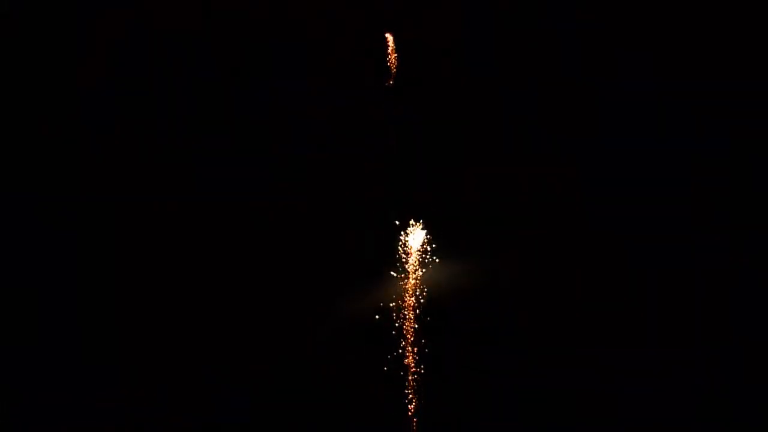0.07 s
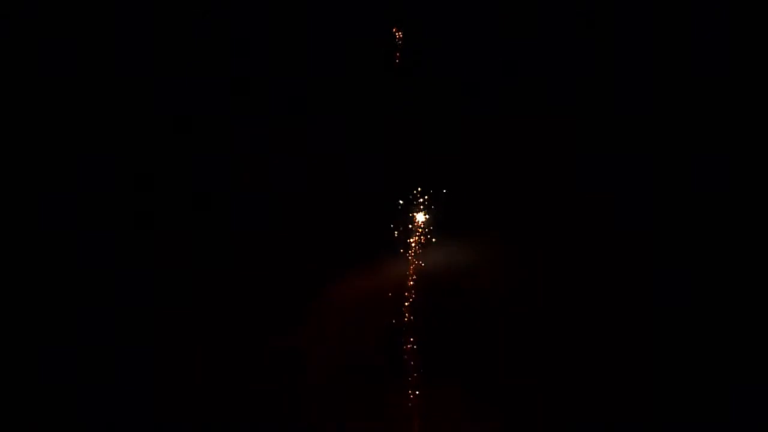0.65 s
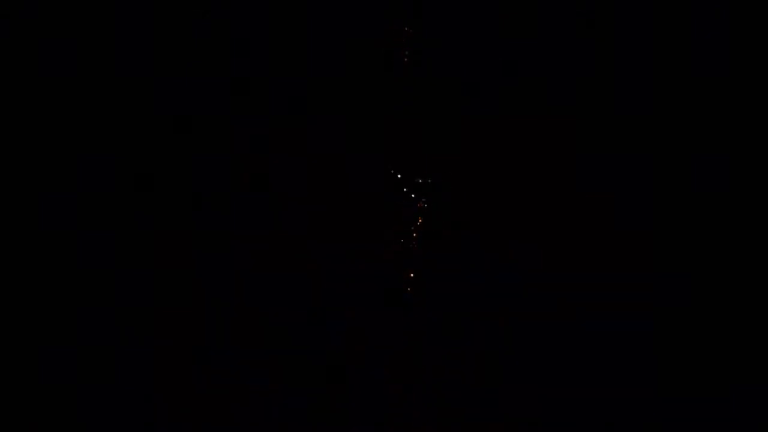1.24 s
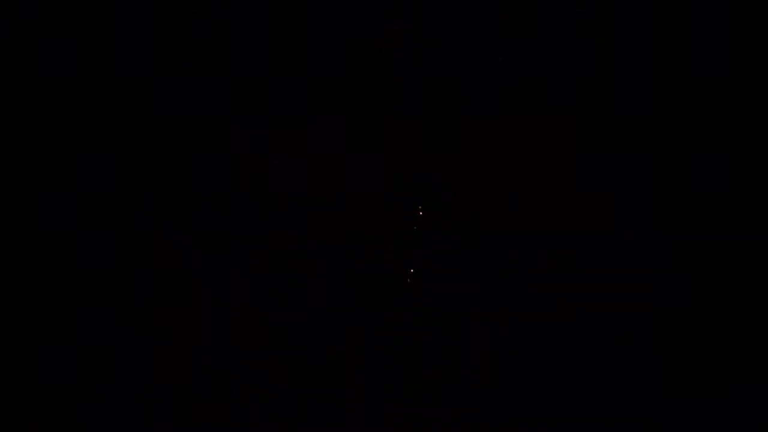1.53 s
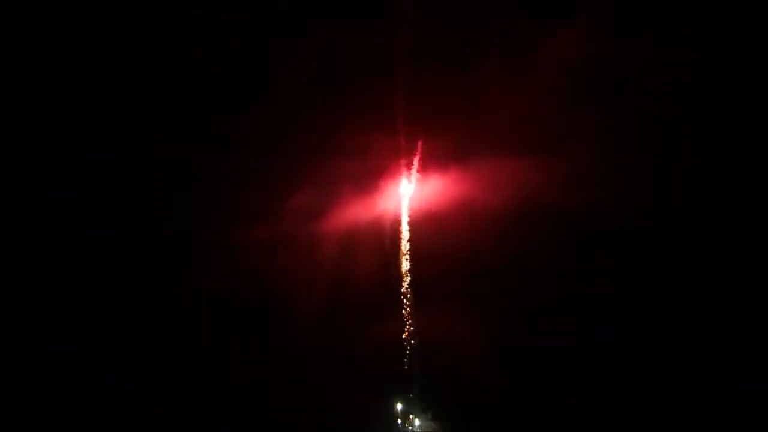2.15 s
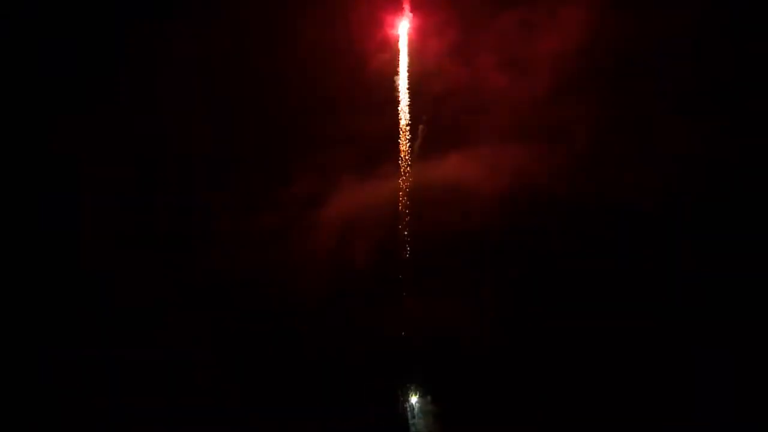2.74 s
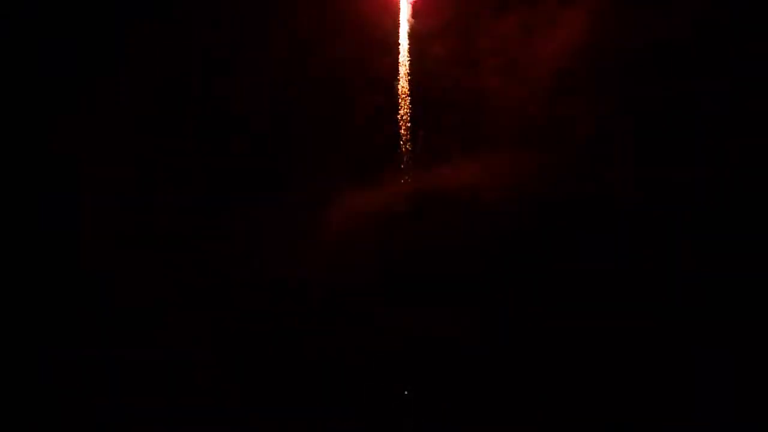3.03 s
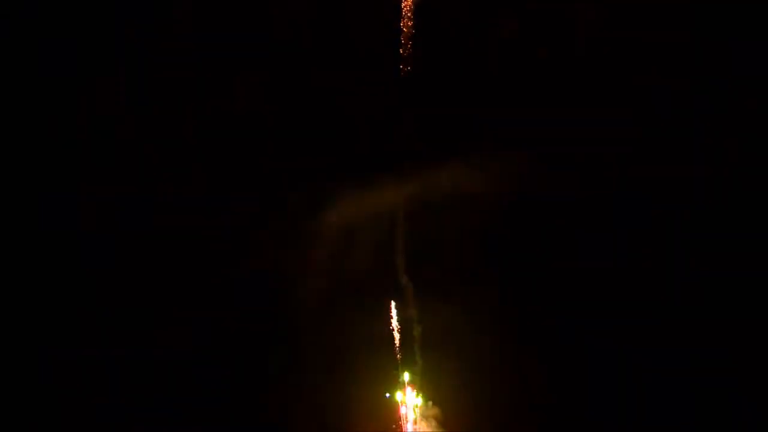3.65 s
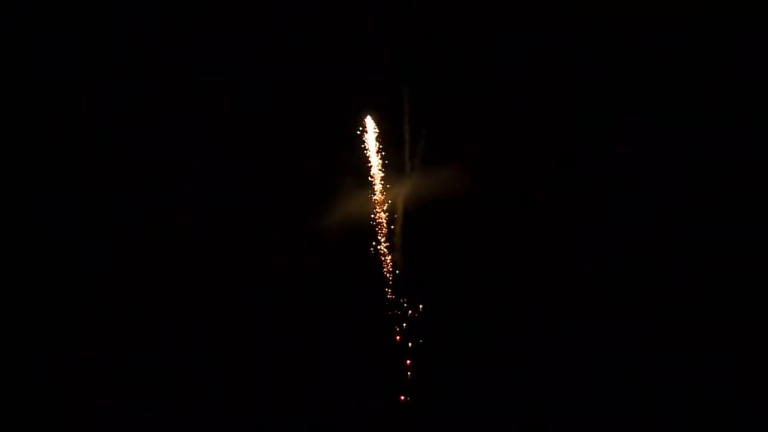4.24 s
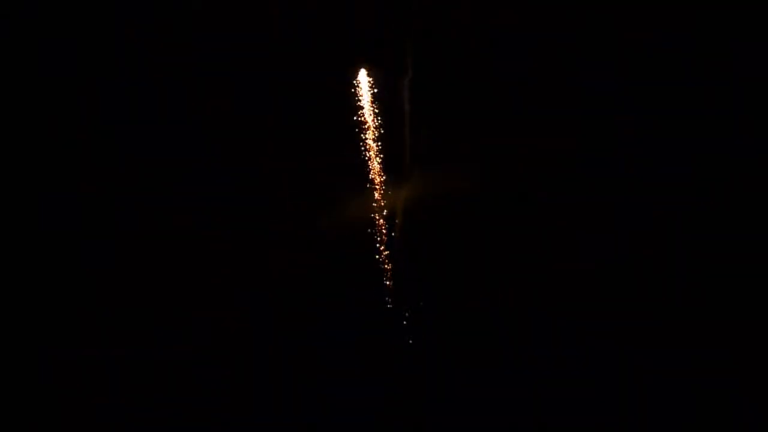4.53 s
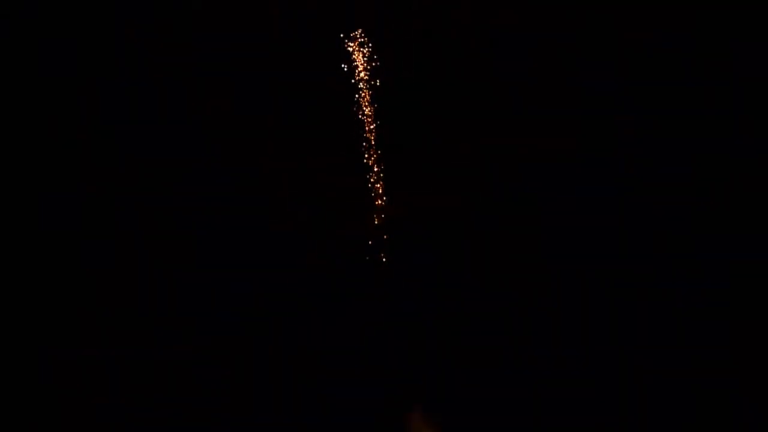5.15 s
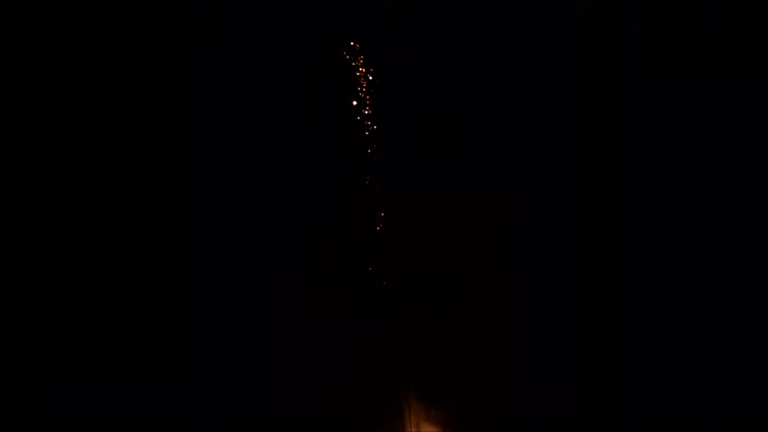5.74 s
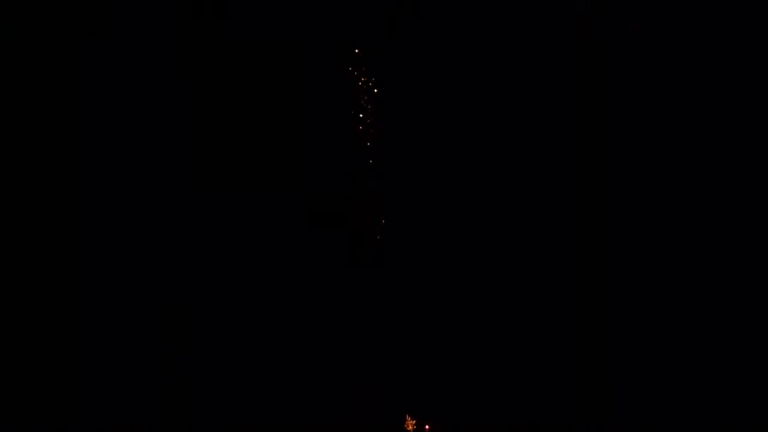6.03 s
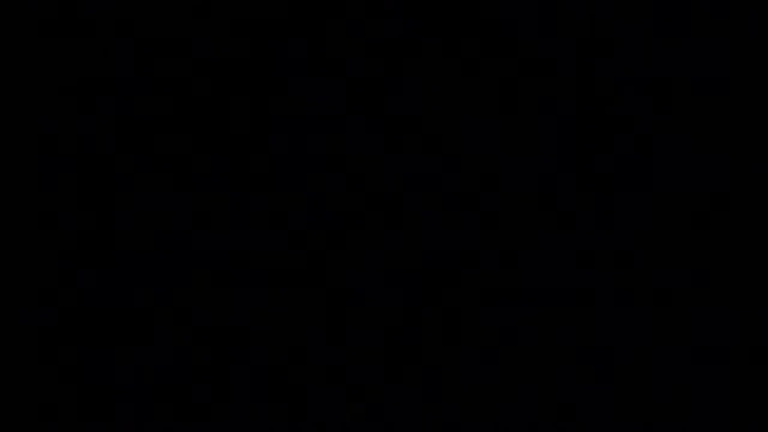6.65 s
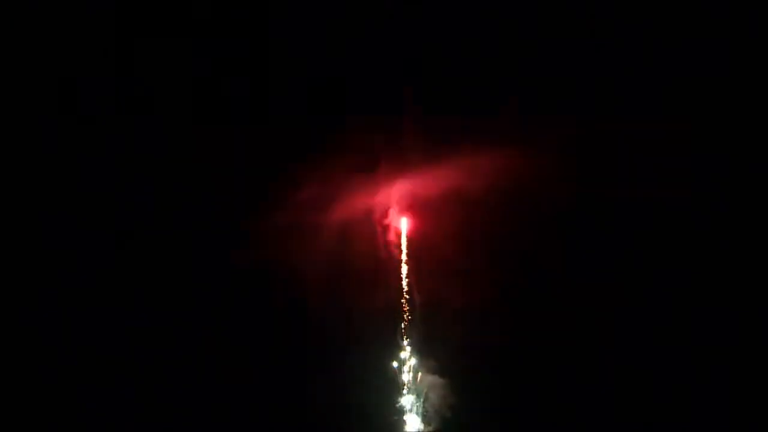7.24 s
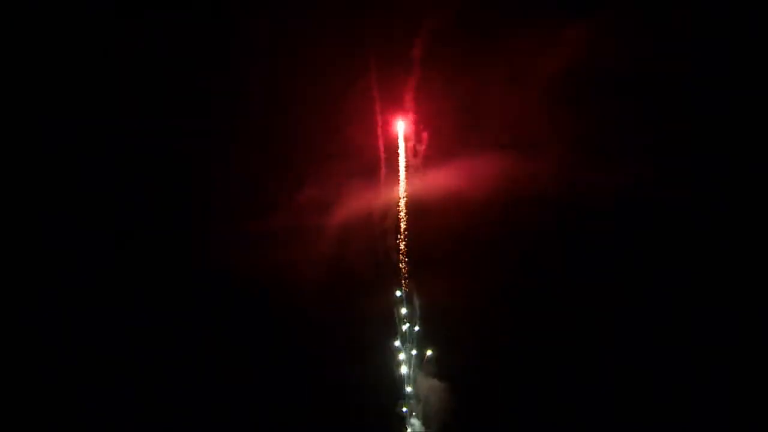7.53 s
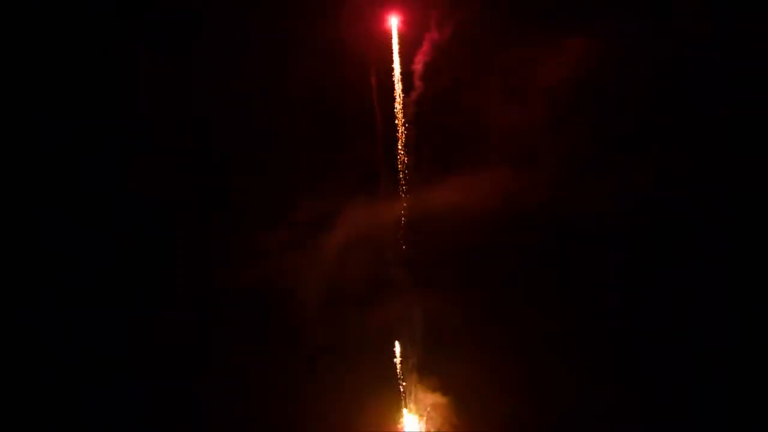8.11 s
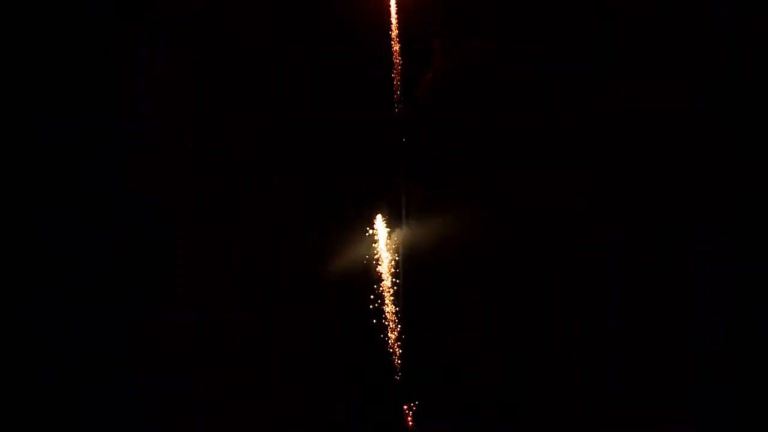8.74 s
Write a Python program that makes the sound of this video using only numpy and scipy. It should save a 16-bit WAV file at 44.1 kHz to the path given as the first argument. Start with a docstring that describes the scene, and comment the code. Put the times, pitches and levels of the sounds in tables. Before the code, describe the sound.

A firework battery fires outdoors, opening on the dense crackle of a climbing comet, with a soft launch thump near 0.4 seconds. From 0.8 to 1.5 seconds, stars burst in sharp cracks that bunch into a swarm. A fuse whistles faintly, and a blunt thump at 1.8 seconds releases a soft, fading hiss. After a faint fuse rush, another thump at 3.6 seconds starts a crackling tail that sweeps in tone and thins out around a weak thump at 5.3. A second swarm of cracks runs from 5.9 to 6.4 seconds, with one loud crack at 6.6. The strongest thump lands at 7 seconds, followed by soft hissing. Another at 8.1 brings crackle from 8.4 until about 9. Far walls echo lightly, while a breeze rumbles over a faint low hum, mostly on the left.

```python
"""A firework battery fires outdoors at night: its tubes thump and send up comets. Red comets hiss softly;
gold ones trail tiny exploding grains and, at the top, a swarm of stars bursts in sharp cracks.
The ground repeats each crack a few milliseconds later, and the gap grows as a comet climbs, so the
crackle sweeps in tone. Fuses whistle faintly and far walls answer.
A breeze rumbles over a faint low hum, mostly on the left."""
import sys
import numpy as np
from scipy import signal
from scipy.fft import rfft, irfft, next_fast_len
from scipy.io import wavfile
from scipy.ndimage import uniform_filter1d, minimum_filter1d, map_coordinates

SR = 44100
rng = np.random.default_rng(int(sys.argv[2]) if len(sys.argv) > 2 else 0)


def store_wav(level_fs):
    """Save 16-bit WAV to argv[1]."""
    pcm = np.round(np.clip(np.atleast_2d(level_fs), -1, 1) * 32767)
    wavfile.write(sys.argv[1], SR, pcm.T.astype(np.int16))


N = 396018

# Charges that launch the comets. Each row: start in seconds, level, treble and bass in dB, tube pitch in Hz.
LIFT_CHARGES = [(0.4469, -10, -9, -3, 345), (1.7646, 0.5, 0, -2, 350), (3.576, 0, 2.5, -2.5, 410),
                (5.3272, -10.5, -8, -6, 345), (7.0435, 8.5, 1, 0.5, 370), (8.0573, -1, -0.5, -7, 350)]
# Gold comets. Each row: launch in seconds, typical grain level in dB,
# ground-echo delay gained over the climb in milliseconds, burning time in seconds.
GOLD_COMETS = [(-1.15, -13.3, 2.6, 1.34), (3.576, -19, 3.35, 1.49), (8.0573, -16.2, 2.7, 1.45)]
# The largest grains in the gold tails. Each row: start in seconds, relative level in dB.
BIG_GRAINS = [(0.0139, -4.5), (0.022, -5.5), (0.0361, -6), (0.0728, -2.5), (0.1101, -1.5), (0.1152, -5),
              (0.158, -1), (0.2074, -4), (0.2167, -0.5), (0.241, -3), (0.2774, 2.5), (0.296, -3.5),
              (0.3653, -4), (0.3888, -4), (0.4177, 0.5), (0.4389, -2), (0.4528, 0), (0.4886, -1),
              (0.522, -6.5), (0.5715, -2.5), (0.5823, -1.5), (0.6394, -23), (0.6892, -22), (3.8219, -17.5),
              (3.8476, -14), (3.8908, -6), (3.901, -9), (3.9521, -11), (4.0092, -5), (4.0529, -10),
              (4.063, -8), (4.3836, -5), (4.5005, -7.5), (4.5809, -7), (4.6222, -10), (4.6419, -3),
              (4.6988, -4), (4.778, -10), (4.8098, -3), (4.839, -7), (5.0142, -11), (5.1456, -12),
              (5.1752, -14), (5.2117, -21.5), (5.2754, -5), (5.457, -27.5), (5.6037, -25), (5.7783, -27.5),
              (8.371, -11.5), (8.4122, -9), (8.5544, -4.5), (8.5669, -5), (8.6216, -6.5), (8.7274, -5),
              (8.7396, -2.5), (8.7553, -6), (8.8123, -5.5), (8.8944, -8), (8.955, -9)]
# Stars that stand out, alone or by their strength. Each row: start in seconds, relative level in dB.
SINGLE_STARS = [(0.7942, -2), (0.8888, -5), (0.9826, 2), (1.014, -1.5), (1.0413, -2), (1.0633, -4.5),
                (1.0699, 1), (1.0873, -6), (1.1182, -2), (1.1231, -5), (1.1397, -2), (1.1935, 4),
                (1.2161, 0), (1.2303, 2.5), (1.2593, 3), (1.3157, 5), (1.3443, 4.5), (1.3649, 0.5),
                (1.3884, 0.5), (1.393, -2), (1.398, -3), (1.4282, 1), (1.495, -2), (1.5359, -1), (5.886, 1),
                (5.9403, -1.5), (5.9504, -3), (5.9762, 1), (6.0677, 0), (6.0925, 5), (6.1006, 4.5),
                (6.1052, 2), (6.113, 2), (6.1441, 1.5), (6.1619, 2.5), (6.1851, 1.5), (6.2151, -4),
                (6.2246, -4.5), (6.2528, 2), (6.3084, 0), (6.3397, -3.5), (6.4214, -2.5), (6.6367, 8.8)]
# Thick swarms of stars. Each row: start and length in seconds, relative level in dB,
# ground-echo delay in milliseconds.
STAR_SWARMS = [(1.158, .185, -3, 3.2), (5.963, .18, -3.5, 2.76)]
# Red comets. Each row: launch in seconds, rush level in dB, sizzle level in dB.
RED_COMETS = [(1.7646, -47.5, -65), (7.0435, -49, -64)]
# Gas jets of the fuses. Each row: start and length in seconds, pitch in Hz, level in dB, pitch waver in Hz.
FUSE_JETS = [(1.5, .52, 1650, -58, 26), (3.14, .5, 1880, -56, 450)]
# Level of the low rumble, which ducks during the loud star bursts.
# Each row: time in seconds, relative level in dB.
RUMBLE_LEVELS = [(0.0, -53), (0.57, -52), (1.45, -60), (2.58, -51), (4.35, -55), (4.63, -50), (5.95, -56),
                 (6.4, -60), (7.65, -54), (7.98, -55), (8.68, -52), (8.98, -55)]
# The tone of five sounds. Each row: frequency in Hz, relative level in dB.
CRACK_TONE = [(40, -7), (200, -14), (450, -4.5), (1000, -3.5), (2200, -1.5), (3300, -1.5), (4300, -13),
              (6000, -16), (9000, -20), (12000, -24.5), (14000, -37), (16000, -37)]  # a grain or star bursting
THUMP_TONE = [(25, 3), (70, 7.5), (200, 1.5), (380, -1), (700, -4.5), (1500, -13), (2400, -10.5),
              (3400, -16.5), (4500, -29), (9000, -35.5), (15000, -52)]  # a lift charge
RUSH_TONE = [(60, 9), (300, 2), (700, 4.5), (1500, 3), (2700, -2), (3700, -3.5), (4600, -36.5), (8000, -42)]  # the low part of a flame
SIZZLE_TONE = [(2500, -28), (4500, 10), (6000, 3), (10000, 3), (13000, -5), (16000, -5.5)]  # the high part of a flame
RUMBLE_TONE = [(15, -13), (30, -6.5), (50, 2.5), (85, -4), (120, -7), (170, -12), (260, -25.5),
               (500, -26.5), (1500, -63.5)]  # the breeze
# How fast reflections die away. Each row: frequency in Hz, seconds to fade by 60 dB.
NEARBY_DECAY = [(200, 0.043), (1000, 0.042), (2500, 0.033), (5000, 0.038), (10000, 0.018)]  # things close by
FIELD_DECAY = [(200, .9), (2000, 1), (10000, 0.32)]  # the open field
# Echoes from far walls. Each row: delay in seconds, relative level in dB.
WALL_ECHOES = [(.169, -21), (.201, -21)]
# Peaks and dips caused by the microphone housing. Each row: frequency in Hz, width in Hz, gain in dB.
HOUSING_PEAKS = [(177, 73, 3.5), (354, 42, 1.5), (562, 150, -4), (716, 100, 2.5), (1080, 230, 1.5),
                 (1278, 120, -2.5), (1800, 81, 1.5), (2470, 720, 5.5), (2980, 200, -4), (5024, 610, -6.5),
                 (5420, 210, 2.5), (7410, 700, -5)]
# The microphone's two openings (ports). Each row: frequency in Hz, phase by which the left leads in radians.
PORT_PHASES = [(3400, -0.21), (4100, 1.5), (4800, 1.53), (5500, 0.16), (7500, 0.47), (8800, 0.031),
               (9800, 1), (11000, -1.73), (12500, 0.95)]

IGNITE_S, IGNITE_RISE_S = .17, .015  # how long after launch a comet lights, and how quickly
GROUND_SHARE = .68  # strength of a grain's ground echo next to its direct sound


def lift_thumps(tube_db=-22, tube_fade_s=0.043, spit_db=-24, spit_lead_s=.0018):
    """A lift charge spits briefly, then leaves as one blunt shock; each empty tube rings at its own pitch."""
    starts, level_db, treble_db, bass_db, tube_hz = np.transpose(LIFT_CHARGES)
    t = np.arange(4096) / SR
    ring = amp(tube_db - 60 * t / tube_fade_s) * np.sin(2 * np.pi * tube_hz[:, None] * t)
    weight_db = np.outer(bass_db, below(np.fft.rfftfreq(len(t), 1 / SR), corner_hz=170))
    blast = shocks(THUMP_TONE, treble_db, corner_hz=1500, size=len(t), colour_db=weight_db)
    thumps = amp(level_db)[:, None] * (blast - ring)
    return place(starts, thumps) + amp(spit_db) * place(starts - spit_lead_s, thumps)


def gold_flight(times, climb_s=1.75, launch_echo_ms=1.02):
    """The latest gold comet slows as it climbs. Gives its age, grain level, echo delay and time burnt out."""
    launch, grain_db, climb_ms, burning_s = np.transpose(GOLD_COMETS)
    latest = np.searchsorted(launch, times) - 1
    age = times - launch[latest]
    echo_ms = launch_echo_ms + climb_ms[latest] * (1 - (1 - age / climb_s) ** 2)
    return age, grain_db[latest], echo_ms, np.maximum(age - burning_s[latest], 0)


def gold_tails(count=720, life_s=2.3, catch_s=.35, fiercest_s=1.03, thinning=.4):
    """Hundreds of grains a second explode behind a gold comet, in uneven bunches; a spent tail sheds few."""
    ages = (np.arange(count) + rng.uniform(-2, 2, (len(GOLD_COMETS), count))) * life_s / count
    times = (np.array(GOLD_COMETS)[:, :1] + ages).ravel()
    times = times[(times > 0) & (times < (N - 1) / SR)]
    age, grain_db, echo_ms, spent_s = gold_flight(times)
    catching_db = -110 * np.maximum(catch_s - age, 0)  # the tail swells until it is fully alight
    burn_db = catching_db - 10 * (age - fiercest_s) ** 2  # it burns hardest in mid-climb
    dying_db = np.maximum(-75 * spent_s, -17 - 22 * spent_s)  # a fast burn-out, then ticking embers
    bunches_db = 2.5 * np.minimum(wobble(60), .7)[(times * SR).astype(int)]
    size, sharpness = rng.standard_normal((2, len(times)))
    # Thinning is the share of the burn-out that comes from fewer grains rather than smaller ones.
    explodes = rng.uniform(size=len(times)) < amp(thinning * dying_db) ** 2
    peak_db = grain_db + burn_db + (1 - thinning) * dying_db + bunches_db + 5 * np.minimum(size, 1.4)
    peak_db = np.where(explodes, peak_db, -np.inf)
    return cracks(times, peak_db, echo_ms, treble_db=6 + 3.5 * sharpness, body_db=2.5)


def big_grains(boost_db=0.5):
    """Now and then a large grain snaps out of a gold tail."""
    starts, level_db = np.transpose(BIG_GRAINS)
    _, _, echo_ms, _ = gold_flight(starts)
    treble_db = 6 + 1.5 * rng.standard_normal(len(starts))
    return cracks(starts, level_db + boost_db, echo_ms, treble_db, body_db=1)


def stars(per_swarm=18, boost_db=0.5, dulling_db_per_s=10):
    """Stars burst high up, duller and thinner than the grains: stragglers before and after a thick swarm."""
    start, length, swarm_db, swarm_echo_ms = np.transpose(STAR_SWARMS)
    progress = (np.arange(per_swarm) + rng.uniform(size=(len(start), per_swarm))) / per_swarm
    thick_s = start[:, None] + length[:, None] * progress
    thick_db = swarm_db[:, None] + 2 * rng.standard_normal(thick_s.shape)
    single_s, single_db = np.transpose(SINGLE_STARS)
    times, level_db = np.r_[single_s, thick_s.ravel()], np.r_[single_db, thick_db.ravel()]
    swarm = np.abs(times[:, None] - start).argmin(axis=1)  # the swarm nearest in time
    sharpness, height = rng.standard_normal((len(times), 2)).T
    late_s = times - start[swarm]
    treble_db = np.maximum(2.5 - dulling_db_per_s * late_s, -2) + 1.2 * sharpness  # late stars are duller
    echo_ms = swarm_echo_ms[swarm] + .2 * height
    return cracks(times, level_db + boost_db, echo_ms, treble_db, body_db=-3, echo_share=.24)


def cracks(times, peak_db, echo_ms, treble_db, body_db, echo_share=GROUND_SHARE, size=512):
    """Each tiny explosion has its own tone and arrives twice: directly, then off the ground."""
    hz = np.fft.rfftfreq(size, 1 / SR)
    own_db = 3.5 * hz / (hz + 2000) * ripples(hz, len(times)) + body_db * below(hz, corner_hz=650)
    delay_s = (echo_ms + .06 * rng.standard_normal(len(times))) / 1000  # heights differ slightly
    channels = []
    for _ in range(2):
        # The housing shades the treble differently for each port and direction.
        shade_db = 4.5 * hz ** 4 / (hz ** 4 + 4000 ** 4) * ripples(hz, len(times))
        pulses = shocks(CRACK_TONE, treble_db, corner_hz=4640, size=size, colour_db=own_db + shade_db)
        waves = amp(peak_db)[:, None] * pulses
        channels.append(place(times, waves) + place(times + delay_s, waves * echo_share))
    return np.array(channels)


def shocks(tone, treble_db, corner_hz, size, colour_db):
    """An explosion is a sudden pulse of pressure. Makes one, with a peak of 1, for each treble level."""
    hz = np.fft.rfftfreq(size, 1 / SR)
    db = tone_at(tone, hz) + housing_db(hz) + colour_db + np.outer(treble_db, 1 - below(hz, corner_hz))
    # Folding the cepstrum keeps the tone but packs the energy at the start of the pulse.
    cepstrum = irfft(np.log(amp(db)))
    fold = np.r_[1, np.full(size // 2 - 1, 2), 1, np.zeros(size // 2 - 1)]
    pulse = irfft(np.exp(rfft(cepstrum * fold)))
    return -pulse / np.abs(pulse).max(axis=1, keepdims=True)


def flames(fuse_lead_s=.3, recede_db_per_s=8, cooling_db_per_s=12):
    """Burning hisses: red comets light with a spit and fade as they climb; gold ones sizzle, then cool."""
    t = np.arange(N) / SR
    rush, sizzle = amp(-55.5), amp(-74.5)  # the battery's steady smoulder; hypot adds noise levels
    for launch, rush_db, sizzle_db in RED_COMETS:
        age = t - launch
        fuse = np.exp(-((age + fuse_lead_s / 2) / fuse_lead_s) ** 2)  # the fuse hisses before launch
        rush, sizzle = np.hypot(rush, fuse * amp(-58)), np.hypot(sizzle, fuse * amp(-70))
        burn = alight(age) * amp(-recede_db_per_s * np.maximum(age - IGNITE_S, 0))
        spit_db = 7 * np.exp(-((age - .2) / .022) ** 2)
        rush = np.hypot(rush, burn * amp(rush_db))
        sizzle = np.hypot(sizzle, burn * amp(sizzle_db + spit_db))
    gold_age, _, _, spent_s = gold_flight(t)
    sizzle = np.hypot(sizzle, alight(gold_age) * amp(-63 - cooling_db_per_s * spent_s))
    flutter, sputter = amp(.8 * wobble(25)), amp(1.5 * wobble(210))
    rushing = rush * noise(RUSH_TONE, side_db=-6)
    sizzling = sizzle * sputter * noise(SIZZLE_TONE, side_db=-3)
    return flutter * (rushing + sizzling)


def alight(age):
    """Rises from 0 to 1 as a comet lights, shortly after its launch."""
    return (1 + np.tanh((age - IGNITE_S) / IGNITE_RISE_S)) / 2


def fuse_jets(overshoot=.09, settle_s=.085):
    """A gas jet starts high and settles: a whistle when it is steady, a narrow rush when it is turbulent."""
    out = np.zeros(N)
    for start, length, hz, db, waver_hz in FUSE_JETS:
        age = np.clip(np.arange(N) / SR - start, 0, length)
        pitch = hz * (1 + overshoot * np.exp(-age / settle_s)) + waver_hz * wobble(600)
        swell = np.sin(np.pi * age / length) * amp(db + 2.5 * wobble(60))
        out += swell * sine(pitch)
    return out


def nearby_scatter(x, size=16384):
    """Things close by scatter the sound, in a new pattern for each stretch as the sparks cross the sky."""
    out = np.zeros((2, N + 2 * size))
    for start in range(0, N, size):
        piece = reverb(np.pad(x[start:start + size], (0, size)), NEARBY_DECAY)
        out[:, start:start + piece.shape[1]] += piece
    return out[:, :N]


def wall_echoes(x, low_hz=600, high_hz=4000):
    """Distant walls send back mainly the middle frequencies, a moment later."""
    def walls(hz):
        echoes = sum(amp(db) * np.exp(-2j * np.pi * hz * delay_s) for delay_s, db in WALL_ECHOES)
        return echoes * hz ** 2 / (hz ** 2 + low_hz ** 2) / (1 + (hz / high_hz) ** 2)
    return filtered(x, walls)


def reverb(x, decay):
    """Many reflections blur into a stereo tail in which each frequency dies at its own speed."""
    hz, t, bands = signal.stft(rng.standard_normal((2, SR)), SR, nperseg=128)
    bands *= amp(-60 * t / tone_at(decay, hz)[:, None])
    # The two ports are close together, so they hear nearly the same bass but different treble.
    difference = .12 + .8 / (1 + (4000 / (hz + 1)) ** 6)
    bands[1] *= difference[:, None]
    mid, side = signal.istft(bands, SR, nperseg=128)[1]
    tail = np.array([mid + side, mid - side])
    return signal.fftconvolve(x[None], tail / np.linalg.norm(tail[0]), axes=1)[:, :len(x)]


def breeze_and_hum(hum_hz=48, waver_hz=1.8):
    """Wind rumbles on the microphone, over a faint, low, wavering hum."""
    level_db = np.interp(np.arange(N) / SR, *np.transpose(RUMBLE_LEVELS))
    flutter_db = .7 * wobble(8)
    hum = amp(4.5) * sine(hum_hz + waver_hz * wobble(6))
    rumble = amp(9.3) * noise(RUMBLE_TONE, side_db=-11.5)
    return amp(level_db + flutter_db) * (rumble + hum)


def housing_db(hz):
    """The microphone housing boosts some frequencies and weakens others."""
    return sum(db / (1 + (2 * (hz - centre) / width) ** 2) for centre, width, db in HOUSING_PEAKS)


def limiter(x, threshold_db=-7, strength=0.61):
    """Loud peaks turn the volume down at once; it recovers slowly, so the background dips after a bang."""
    over_db = np.maximum(20 * np.log10(np.abs(x).max(axis=0) + 1e-9) - threshold_db, 0)
    recovery = 80 * np.arange(N) / SR
    held_db = np.maximum.accumulate(over_db + recovery) - recovery
    smooth_db = uniform_filter1d(minimum_filter1d(-held_db, size=33), size=33)
    return x * amp(strength * smooth_db)


def amp(db):
    """Turns decibels into a gain."""
    return 10 ** (np.asarray(db) / 20)


def tone_at(table, hz):
    """Reads between the rows of a frequency table, on a log frequency scale."""
    frequencies, values = np.transpose(table)
    return np.interp(np.log(hz + 1), np.log(frequencies + 1), values)


def below(hz, corner_hz):
    """Near 1 well under the corner frequency, near 0 far above it."""
    return 1 / (1 + (hz / corner_hz) ** 4)


def ripples(hz, count):
    """Rows of random ripples across the spectrum, with peaks 2 to 8 kHz apart."""
    spacing, phase = rng.uniform(size=(count, 2)).T
    return np.cos(2 * np.pi * (hz / (2000 + 6000 * spacing[:, None]) + phase[:, None]))


def wobble(rate):
    """A smooth curve through `rate` random values a second."""
    return map_coordinates(rng.standard_normal(int(N * rate / SR) + 4), [np.arange(N) * rate / SR])


def sine(pitch_hz):
    """A pure tone of average power 1 that follows a changing pitch."""
    return np.sqrt(2) * np.sin(2 * np.pi * np.cumsum(pitch_hz) / SR)


def noise(tone, side_db):
    """Stereo noise of average power 1, coloured by a tone table and the housing; side_db sets its width."""
    mid, side = filtered(rng.standard_normal((2, N)), lambda hz: amp(tone_at(tone, hz) + housing_db(hz)))
    stereo = np.array([mid + amp(side_db) * side, mid - amp(side_db) * side])
    return stereo / np.sqrt(np.mean(stereo ** 2) + 1e-20)


def filtered(x, response):
    """Changes the strength and phase of each frequency in x by response(hz)."""
    size = next_fast_len(N + SR // 2, True)
    return irfft(rfft(x, size) * response(np.fft.rfftfreq(size, 1 / SR)), size)[..., :N]


def place(times, waves):
    """Adds each row of waves into one track at its start time."""
    index = np.round(np.maximum(times, 0) * SR).astype(int)[:, None] + np.arange(waves.shape[1])
    return np.bincount(index.ravel(), waves.ravel(), N)[:N]


def scene():
    """Cracks and thumps with their reflections, over flames, fuses, breeze and hum."""
    crackle = stars() + big_grains() + gold_tails()
    thumps = lift_thumps()
    close_crackle, close_thumps = nearby_scatter(crackle.mean(axis=0)), nearby_scatter(thumps)
    near = crackle + thumps + amp(-10.5) * (close_crackle + close_thumps)
    # The thumps travel level with the walls, so they return more strongly than cracks from overhead.
    walls = wall_echoes(close_thumps + amp(-9.5) * close_crackle)
    field = amp(-37) * reverb(crackle.mean(axis=0) + thumps, FIELD_DECAY)
    return near + walls + field + flames() + fuse_jets() + breeze_and_hum()


def record(dry, right_cut_hz=215, top_hz=16200):
    """The two ports differ in phase and the right one is thin in the bass; a limiter and top cut follow."""
    def ports(hz):
        s = 1j * hz / right_cut_hz
        bass_cut = s * s / (s * s + np.sqrt(2) * s + 1)
        phase_turn = np.exp(.5j * tone_at(PORT_PHASES, hz))
        return np.array([phase_turn, bass_cut / phase_turn])
    limited = limiter(filtered(dry, ports))
    return filtered(limited, lambda hz: hz < top_hz)


dry = scene()
out = record(dry)
store_wav(out)
```